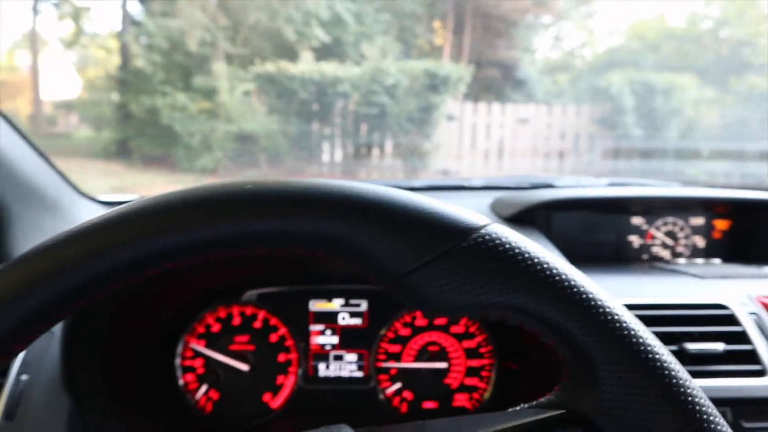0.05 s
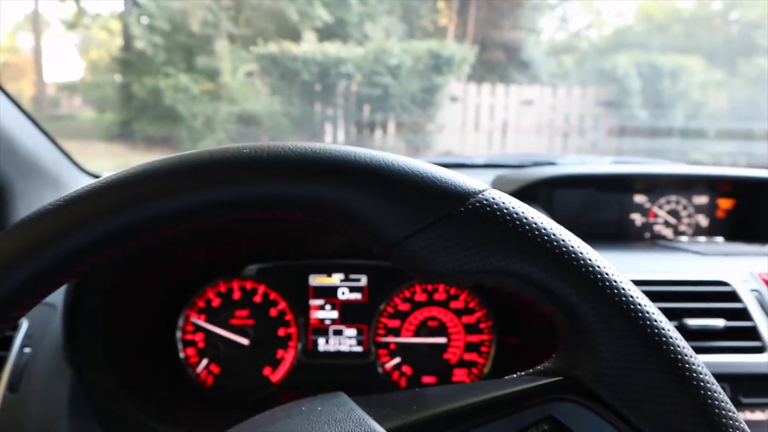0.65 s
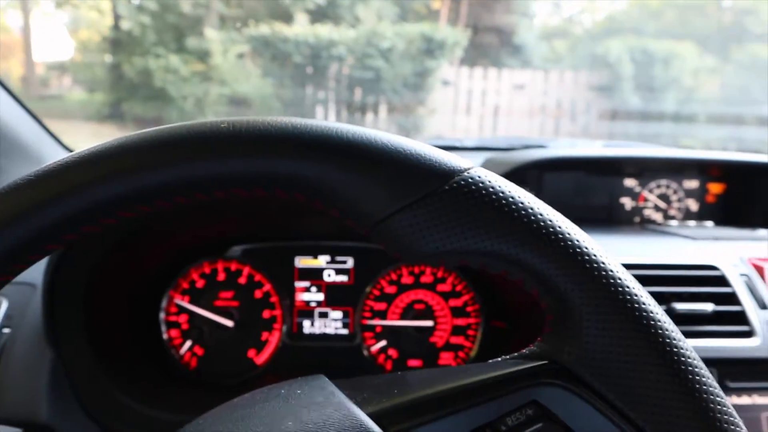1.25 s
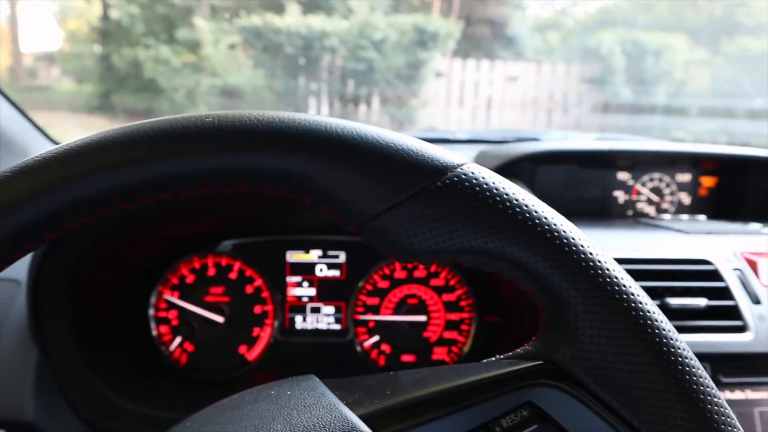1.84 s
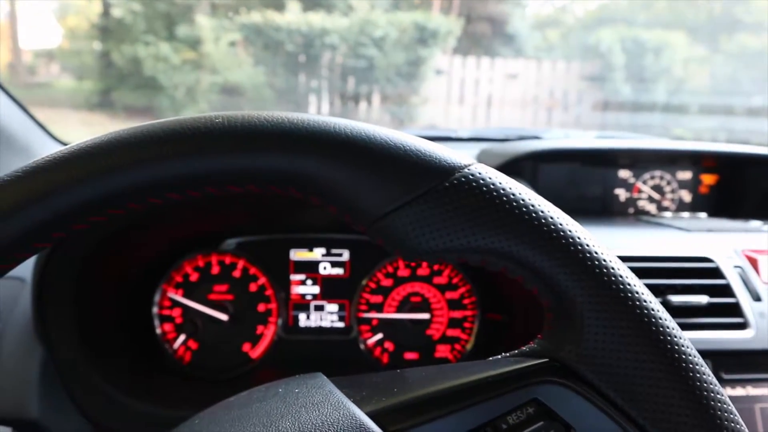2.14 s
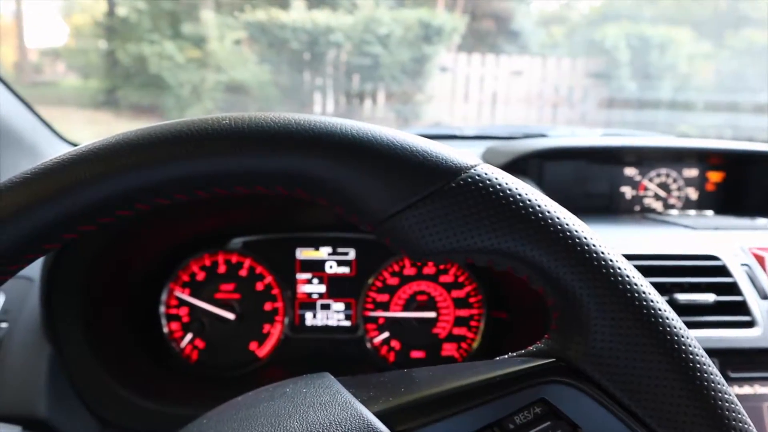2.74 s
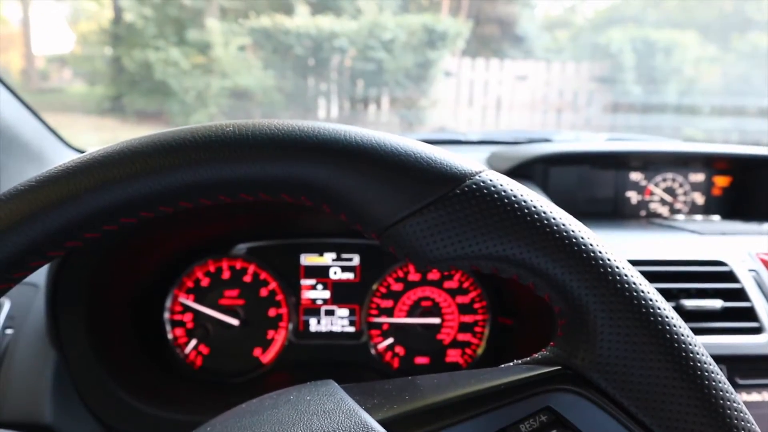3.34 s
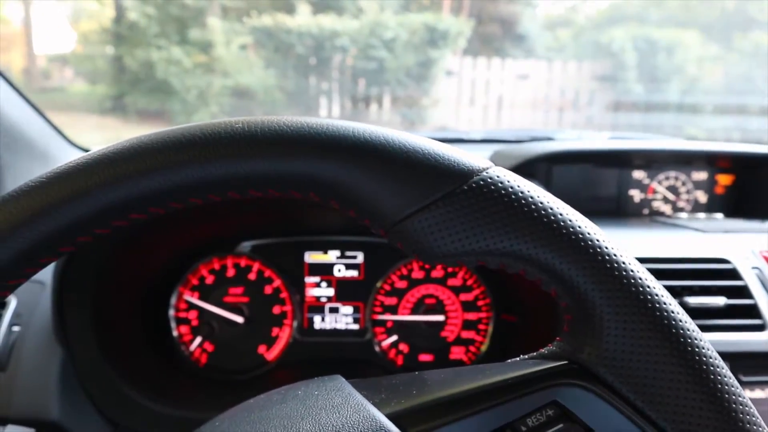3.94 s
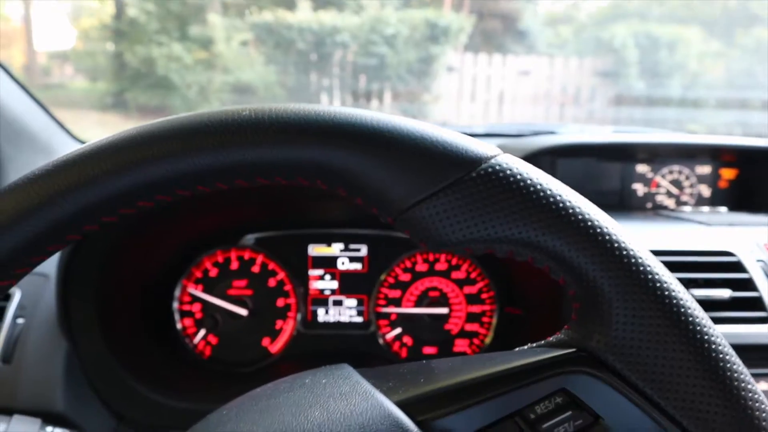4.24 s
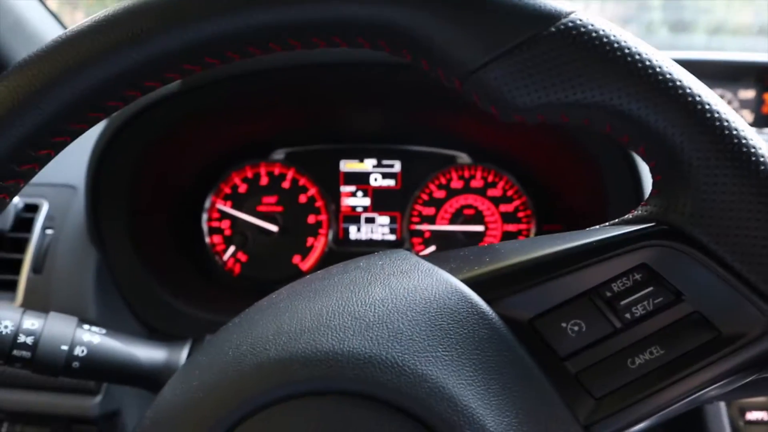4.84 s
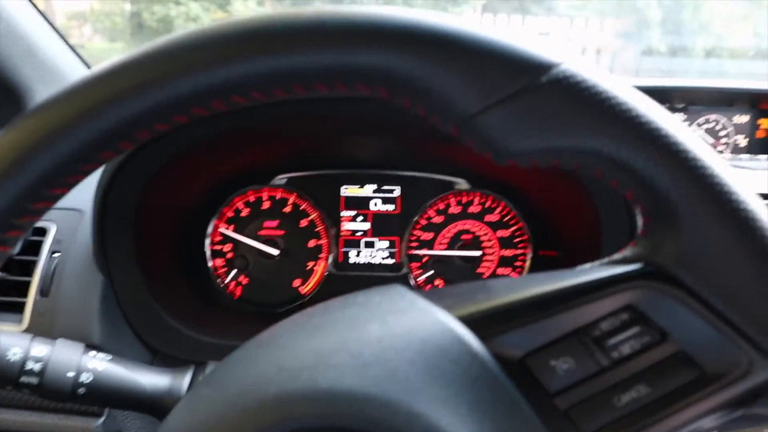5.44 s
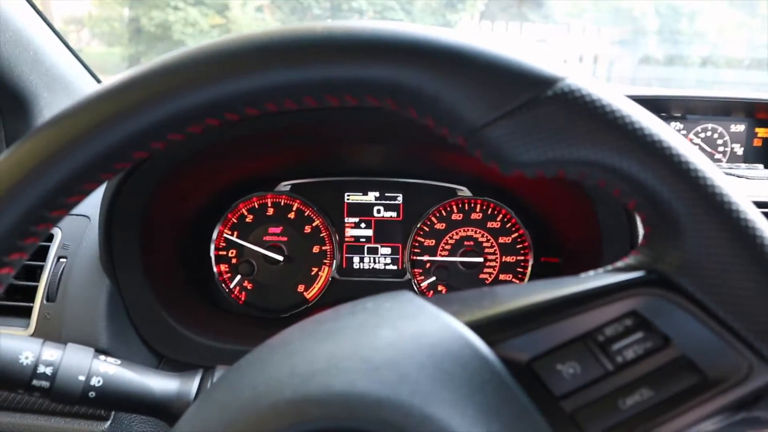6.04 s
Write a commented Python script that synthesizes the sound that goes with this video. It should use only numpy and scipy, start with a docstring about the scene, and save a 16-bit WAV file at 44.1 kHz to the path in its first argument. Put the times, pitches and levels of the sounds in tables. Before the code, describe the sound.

A turbocharged car engine idles throughout with a deep, lopsided throb over a soft hum and hiss of air, heard from the driver's seat with the car closed. Early on, plastic ticks and a bird peeps very faintly outside. A hand rubs and bumps the microphone, and a small motor whines faintly for a few seconds. Later the engine sags briefly, booms a little harder and recovers, among more light rubs and ticks.

```python
"""A turbocharged flat-four engine idles throughout, heard from the driver's seat of a closed car.
Unequal exhaust pipes bunch its firings into a lopsided, booming throb, over a hum and a rush of air.
Near 0.9 s plastic ticks and a bird peeps outside. At 1.4 s a hand rubs and bumps the camera, and a small
motor starts to whine faintly. The bird peeps again at 2.9 s; the hand returns at 4.1 s as the whine fades.
Around 4.5 s the engine sags, booms harder and recovers, among a few more light rubs and ticks."""
import sys
import numpy as np
from scipy import signal
from scipy.fft import rfft, irfft, next_fast_len
from scipy.io import wavfile
from scipy.ndimage import map_coordinates

SR = 44100
rng = np.random.default_rng(int(sys.argv[2]) if len(sys.argv) > 2 else 0)


def master_out(mix):
    """Clip the mix to full scale and print it as 16-bit PCM to the path in sys.argv[1]."""
    frames = np.transpose(np.atleast_2d(mix))
    ceiling = np.clip(frames, -1, 1)
    pcm = np.round(ceiling * 32767).astype(np.int16)
    wavfile.write(sys.argv[1], SR, pcm)


N = 272871

# The idle wanders a little and sags once: time_s, speed_rpm
ENGINE_SPEED = [(0, 842.4), (1.1, 852.9), (1.55, 840.8), (2.3, 854.7), (2.7, 835.1), (3.35, 844.7),
                (4.15, 840.9), (4.45, 801.6), (5.0, 862.4), (5.4, 854.9), (6.19, 862.0)]
# The four firings of one cycle: crank_angle_deg, level_db, pipe_echo_db, scatter_db, knock_db
FIRINGS = [(0, .2, -40, .35, 0), (183.7, -2.8, -40, .7, -6), (351.3, -16, -11.6, 1.1, 0),
           (533.6, -3, -8.6, .7, 1)]
# How the tailpipe and cabin boom: frequency_hz, gain_db
BOOM_SPECTRUM = [(15, -38), (28, -17.7), (42, -59), (53, .5), (58, -.2), (68, -4.6), (82, -1.7), (93, 5.6),
                 (101, -1.6), (108, -5.3), (122, 2.4), (134, -2), (148, -5.8), (163, -19), (174, -34),
                 (188, -52), (400, -57), (3000, -85), (9000, -120)]
# The deepest part of the boom builds a little: time_s, gain_db
DEEP_BOOM_GAIN = [(0, -1.5), (1.3, -1.1), (2.1, .2), (4.2, .2), (5.2, .9)]
# Swirling exhaust gas: frequency_hz, gain_db
RUMBLE_SPECTRUM = [(10, -12.5), (25, -19), (42, -6.5), (60, -7), (125, -6.5), (160, -12), (200, -20.5),
                   (300, -39), (600, -67.5), (2000, -120)]
# The engine block's knock, carried by its mounts: frequency_hz, gain_db
MOUNT_SPECTRUM = [(130, -32.5), (170, -4.5), (240, 6), (330, 3), (450, -18), (700, -16), (1100, -30),
                  (2000, -53), (5000, -120)]
# Steady tones of the drive: multiple_of_crank_speed, level_db
HUM_TONES = [(11.5, -42), (12.5, -50), (14.5, -53), (22, -58), (28, -59), (36, -67.5)]
# Moving parts in the engine bay: frequency_hz, gain_db
BAY_SPECTRUM = [(120, -20.5), (200, 4.5), (290, -5.5), (390, -7), (520, -6.5), (680, -12.5), (950, -17.5),
                (1400, -23.5), (2100, -24.5), (3300, -30), (5000, -39.5), (8000, -46.5), (12000, -76)]
# The hiss of air: frequency_hz, gain_db
HISS_SPECTRUM = [(700, -24), (1300, -0.5), (2000, -2), (3500, -5.5), (5000, -8), (7000, -12), (9500, -15.5),
                 (11000, -18.5), (12500, -43.5), (16000, -120)]
# How the hiss rises and falls: time_s, relative_level_db
HISS_SWELL = [(0.0, -66.5), (1.75, -64.5), (3.21, -69.5), (6.1, -72.5)]
# Small plastic ticks: start_s, level_db, ring_hz, fade_s, shell_db, snap_db
PLASTIC_TICKS = [(.864, -43, 3500, .034, -7, -15), (1.346, -53, 9000, .022, -20, 0),
                 (1.351, -43, 3300, .024, -15, -32), (1.392, -56, 7500, .04, -20, -12),
                 (4.42, -55, 4800, .028, -3, -25), (4.47, -57, 5000, .025, -10, -25),
                 (4.479, -49, 3300, .035, -3, -28), (4.77, -61, 9500, .015, -20, 0),
                 (4.777, -43, 5200, .02, 7, -30), (5.381, -42.5, 2700, .02, -3, -40),
                 (5.405, -58, 3800, .1, -6, -20)]
# A bird's thin peeps: start_s, length_s, pitch_hz, level_db
BIRD_PEEPS = [(0.907, 0.17, 7200, -65), (2.909, 0.14, 7200, -70.5)]
# A hand slides on the camera: start_s, length_s, level_db, treble_db_per_octave, muffled_above_hz
HAND_SLIDES = [(1.404, .012, -36.5, -.5, 13000), (1.415, .034, -34.5, -2, 12000),
               (1.428, .01, -30, -1, 4200), (1.451, .016, -31, 2, 7500), (1.474, .013, -27.5, -.5, 9000),
               (1.487, .01, -32.5, -3.5, 7000), (1.5, .058, -44.5, -1.2, 8500), (4.105, .013, -46, 2, 3000),
               (4.117, .015, -40, -8, 900), (4.131, .016, -39.5, -3.5, 2800), (4.15, .022, -45.5, -6, 1700),
               (4.415, .19, -59, 1.5, 3700), (4.58, .035, -54, -1, 2800), (4.95, .1, -58.5, 2, 4200)]
# The tone of the camera's case: frequency_hz, gain_db
CASE_SPECTRUM = [(120, -27), (200, 3), (324, -16), (398, -14.5), (523, -18), (876, -14.5), (955, -20.5),
                 (1300, -19), (1650, -21), (2250, -28.5), (2650, -24), (3050, -28), (3580, -23.5),
                 (4180, -31), (9220, -37), (12100, -48.5), (15800, -83), (22000, -120)]
# The case's low, hollow ring: frequency_hz, gain_db
THUD_SPECTRUM = [(100, -40), (200, -2), (240, 2), (330, -2), (600, -3), (1000, -20), (2500, -60),
                 (6000, -120)]
# A finger lands on the case: start_s, level_db
FINGER_BUMPS = [(1.428, -34), (1.475, -26), (4.129, -45)]
# The notes a bump rings with: pitch_hz, level_db, fade_s
CASE_NOTES = [(228, 2.5, .16), (300, -6, .08), (545, -6, .09), (690, -3, .07), (850, -4, .05),
              (1300, -5, .035), (2600, -9, .03), (3580, -9, .03)]
# The small motor's tones: multiple_of_motor_speed, level_db
WHINE_TONES = [(7, 0), (10, 0), (11, -4), (12, -9), (20, 0)]
# Pitches at which the cabin rings along: centre_hz, width_hz, gain_db
CABIN_RESONANCES = [(712, 32, 2.5), (885, 28, -6.5), (1012, 25, -3.5), (1068, 28, -4.5), (1185, 45, -1.7),
                    (1985, 40, -11), (2085, 50, -10)]

IDLE_RPM, LOAD_DB_PER_RPM = 850, .0021  # the engine fires harder for every rpm below this aim


def amp(db):
    """Turn decibels into a factor to multiply by."""
    return 10 ** (np.asarray(db) / 20)


def unit(x):
    """Scale a signal to an average (rms) level of 1."""
    return x / np.sqrt(np.mean(x ** 2) + 1e-20)


def die_away(t, fade_s):
    """A fade that falls 60 dB in fade_s."""
    return amp(-60 * t / fade_s)


def along(points, hz):
    """Read between (frequency, value) points on a log frequency axis."""
    frequencies, values = np.transpose(points)
    return np.interp(np.log(hz + 1), np.log(frequencies + 1), values)


def curve(points):
    """Join (time, value) points into one value per sample."""
    times, values = np.transpose(points)
    return np.interp(np.arange(N) / SR, times, values)


def wobble(rate):
    """A smooth random curve through rate points a second."""
    return map_coordinates(rng.standard_normal(int(N * rate / SR) + 4), [np.arange(N) * rate / SR])


def filtered(x, response):
    """Scale each frequency in x by response(hz)."""
    size = next_fast_len(len(x) + SR // 4)
    return irfft(rfft(x, size) * response(np.fft.rfftfreq(size, 1 / SR)), size)[:len(x)]


def coloured(x, spectrum):
    """Shape x with a spectrum table, then set its level to 1."""
    return unit(filtered(x, lambda hz: amp(along(spectrum, hz))))


def ring(spectrum):
    """How a body with this spectrum rings after one sharp tap."""
    cepstrum = irfft(np.log(amp(along(spectrum, np.fft.rfftfreq(SR, 1 / SR)))))
    cepstrum[1:SR // 2] *= 2  # folding this way puts all the ringing after the tap
    cepstrum[SR // 2 + 1:] = 0
    return irfft(np.exp(rfft(cepstrum)))[:SR // 2]


def sag():
    """How far the engine's speed is below its aim, in rpm."""
    return IDLE_RPM - curve(ENGINE_SPEED)


def crank(start_deg):
    """Count the crankshaft's turns, from one second before the sound begins."""
    rpm = np.pad(curve(ENGINE_SPEED), (SR, 0), mode="edge")
    turns = np.cumsum(rpm) / 60 / SR
    return turns - turns[SR] + start_deg / 360


def firings(turns, scatter_deg, echo_s, knock_lag_s, catch_up_db_per_rpm, load_lag_s):
    """Each cylinder fires once in two turns: a pulse, its echo by the long pipe, and a knock."""
    def train(samples, db):
        return np.bincount(samples.ravel(), amp(db).ravel(), len(turns))[:len(turns)]

    angle, level_db, echo_db, scatter_db, knock_db = np.transpose(FIRINGS)
    cycles = np.arange(-3, 46)[:, None]
    late, strong, lasting = rng.standard_normal((3, len(cycles), len(angle)))  # no two burns are alike
    at = np.searchsorted(turns, 2 * cycles + (angle + scatter_deg * late) / 360)
    # The weaker cylinders catch up a moment after the speed sags.
    load = np.interp(at / SR - 1 - load_lag_s, np.arange(N) / SR, sag())
    gain_db = scatter_db * strong + np.where(level_db < 0, catch_up_db_per_rpm * load, 0)
    pulses = train(at, level_db + gain_db)
    echoes = train(at + round(echo_s * SR), echo_db + gain_db + scatter_db * lasting)
    knocks = train(at + round(knock_lag_s * SR), knock_db + scatter_db * strong)
    return pulses + echoes, knocks


def exhaust(pulses, level_db, rumble_db, deep_hz):
    """Pulses boom through pipe and cabin over rumbling gas; both grow as the speed sags."""
    boom = unit(signal.fftconvolve(pulses, ring(BOOM_SPECTRUM))[SR:SR + N])
    deep = filtered(boom, lambda hz: 1 / (1 + (hz / deep_hz) ** 16))
    boom += (amp(curve(DEEP_BOOM_GAIN)) - 1) * deep
    rumble = coloured(rng.standard_normal(N), RUMBLE_SPECTRUM)
    return amp(LOAD_DB_PER_RPM * sag()) * (amp(level_db) * boom + amp(rumble_db) * rumble)


def engine_block(knocks, turns, knock_db, fade_s, waver_db, hum_db_per_rpm):
    """Every firing shakes the same panels; the drive hums with the shaft, louder when strained."""
    t = np.arange(SR // 4) / SR
    panels = rng.standard_normal(len(t)) * die_away(t, fade_s)
    knock = coloured(signal.fftconvolve(knocks, panels)[SR:SR + N], MOUNT_SPECTRUM)
    hum = sum(amp(db + waver_db * wobble(2.6)) * np.sqrt(2) * np.sin(2 * np.pi * multiple * turns)
              for multiple, db in HUM_TONES)
    return amp(knock_db + LOAD_DB_PER_RPM * sag()) * knock + amp(hum_db_per_rpm * sag()) * hum


def air(turns, bay_db, hiss_gain_db, throb):
    """Engine bay noise swells twice a turn, along with a smooth hiss of air."""
    swell = 1 + throb * np.cos(4 * np.pi * turns)
    bay = amp(bay_db + .79 * wobble(9.6)) * swell * coloured(rng.standard_normal(N), BAY_SPECTRUM)
    hiss = amp(curve(HISS_SWELL) + hiss_gain_db) * coloured(rng.standard_normal(N), HISS_SPECTRUM)
    return bay + hiss


def plastic_ticks(sharpness, rise_s, shell_hz, snap_hz):
    """Each dry crack has its own ring, between the shell's knock and a thin snap."""
    def peak(hz, centre):
        return 1 / (1 + (sharpness * (centre ** 2 - hz ** 2) / ((hz + 1) * centre)) ** 2)

    out = np.zeros(N)
    t = np.arange(SR // 8) / SR
    rise = np.minimum(t / rise_s, 1)
    for start_s, db, ring_hz, fade_s, shell_db, snap_db in PLASTIC_TICKS:
        def plastic(hz):
            shell = amp(shell_db) * peak(hz, shell_hz)
            return peak(hz, ring_hz) + shell + amp(snap_db) * peak(hz, snap_hz)

        crack = unit(filtered(rng.standard_normal(len(t)), plastic))
        out[round(start_s * SR):][:len(t)] += amp(db) * rise * die_away(t, fade_s) * crack
    return out


def bird(fall, quaver):
    """Each peep starts quickly, then fades as its pitch falls a little."""
    out = np.zeros(N)
    for start_s, length_s, hz, db in BIRD_PEEPS:
        progress = np.clip((np.arange(N) / SR - start_s) / length_s, 0, 1)
        pitch_hz = hz * (1 - fall * progress + quaver * wobble(200))
        loudness = amp(db) * np.minimum(10 * progress, 1 - progress)
        out += loudness * np.sin(2 * np.pi * np.cumsum(pitch_hz) / SR)
    return out


def hand_rubs(grain_db, edge_s, bright_hz, thud_db, thud_fade_s):
    """Each slide is a gritty run of tiny slips on the case, whose low ring outlasts it."""
    out = np.zeros(N)
    t = np.arange(SR // 3) / SR
    for start_s, length_s, db, slope_db, muffle_hz in HAND_SLIDES:
        def case_tone(hz):
            treble_db = slope_db * np.log2(np.hypot(1, hz / bright_hz))
            return amp(along(CASE_SPECTRUM, hz) + treble_db) / np.hypot(1, (hz / muffle_hz) ** 4)

        pressure = np.clip(t / edge_s, 0, 1) * np.exp(-np.maximum(t - length_s, 0) / edge_s)
        grit = amp(grain_db * wobble(1100)[:len(t)])
        slips = pressure * grit * rng.standard_normal(len(t))
        hollow = rng.standard_normal(len(t)) * die_away(t, thud_fade_s)
        thud = coloured(signal.fftconvolve(slips, hollow)[:len(t)], THUD_SPECTRUM)
        slide = unit(filtered(slips, case_tone)) + amp(thud_db) * thud
        out[round(start_s * SR):][:len(t)] += amp(db) * np.sqrt(np.mean(pressure ** 2)) * slide
    return out


def finger_bumps(rise_cycles):
    """A soft blow rings the case; the low notes build up last and ring longest."""
    out = np.zeros(N)
    t = np.arange(SR // 4) / SR
    for start_s, bump_db in FINGER_BUMPS:
        for hz, note_db, fade_s in CASE_NOTES:
            swell = 1 - np.exp(-t * hz / rise_cycles)
            phase = 2 * np.pi * (hz * t + rng.random()) + .5 * wobble(120)[:len(t)]
            note = swell * die_away(t, fade_s) * np.sin(phase)
            out[round(start_s * SR):][:len(t)] += amp(bump_db + note_db) * note
    return out


def motor_whine(level_db, flutter_db, start_s, end_s, fade_s, low_hz, low_at_s, dip_s, rise):
    """A small motor slows, then picks up; its tones swell as they cross the cabin's resonances."""
    def cabin(hz):
        return sum(amp(db) / (1 + (2 * (hz - centre) / width) ** 2)
                   for centre, width, db in CABIN_RESONANCES)

    t = np.arange(N) / SR
    speed_hz = low_hz * (1 + rise * np.sin(np.pi * (t - low_at_s) / dip_s) ** 2)
    turns = np.cumsum(speed_hz * (1 + .0022 * wobble(20))) / SR
    out = np.zeros(N)
    for multiple, db in WHINE_TONES:
        loudness = amp(level_db + db + flutter_db * wobble(15)) * cabin(multiple * speed_hz)
        out += loudness * np.sin(2 * np.pi * multiple * turns)
    fade = np.clip(np.minimum(t - start_s, end_s - t) / fade_s, 0, 1)
    return fade * out


def scene():
    """The crankshaft drives every engine layer; the small sounds are added on top."""
    turns = crank(start_deg=511.5)
    pulses, knocks = firings(turns, scatter_deg=1.1, echo_s=.0057, knock_lag_s=.007,
                             catch_up_db_per_rpm=.058, load_lag_s=.08)
    mix = exhaust(pulses, level_db=-16.1, rumble_db=-38, deep_hz=68)
    mix += engine_block(knocks, turns[SR:], knock_db=-47.8, fade_s=.085, waver_db=2, hum_db_per_rpm=.06)
    mix += air(turns[SR:], bay_db=-47.5, hiss_gain_db=4, throb=.11)
    mix += plastic_ticks(sharpness=2.1, rise_s=.0015, shell_hz=1850, snap_hz=10500)
    mix += bird(fall=.02, quaver=.006)
    mix += hand_rubs(grain_db=2.2, edge_s=.003, bright_hz=1190, thud_db=-5, thud_fade_s=.09)
    mix += finger_bumps(rise_cycles=.8)
    mix += motor_whine(level_db=-60, flutter_db=2.5, start_s=1.45, end_s=4.25, fade_s=.25,
                       low_hz=99, low_at_s=3.27, dip_s=3.6, rise=.205)
    return mix[None]


def record(dry):
    """The sound fades in quickly and loses its highest treble."""
    fade_in_s, top_hz = .004, 12800
    opening = np.minimum(np.arange(N) / SR / fade_in_s, 1)
    return filtered(opening * dry[0], lambda hz: 1 / (1 + (hz / top_hz) ** 40))[None]


dry = scene()
out = record(dry)
master_out(out)
```